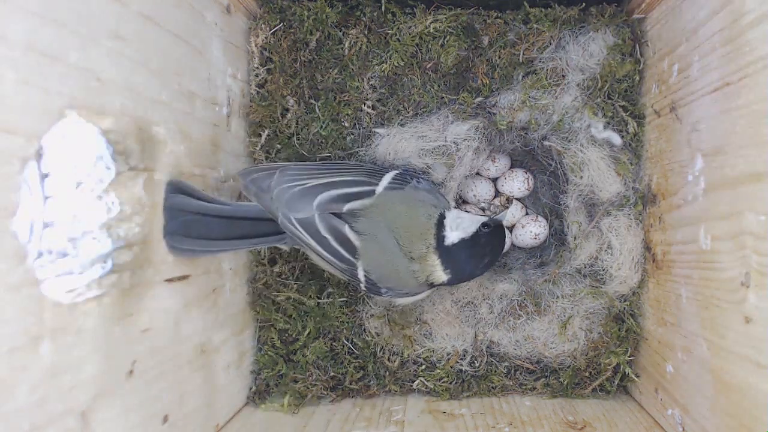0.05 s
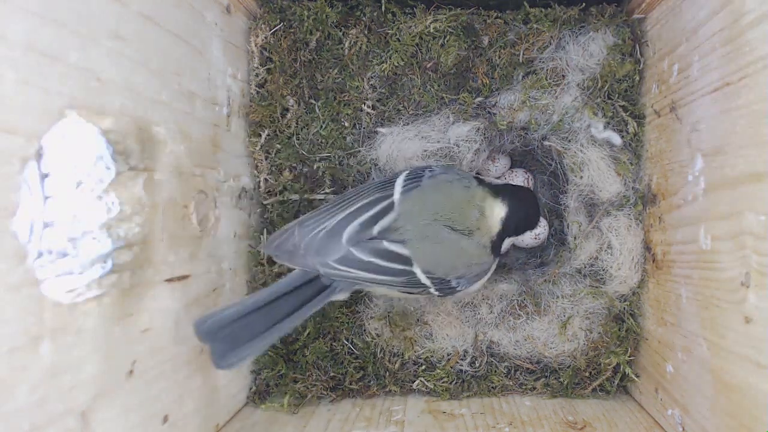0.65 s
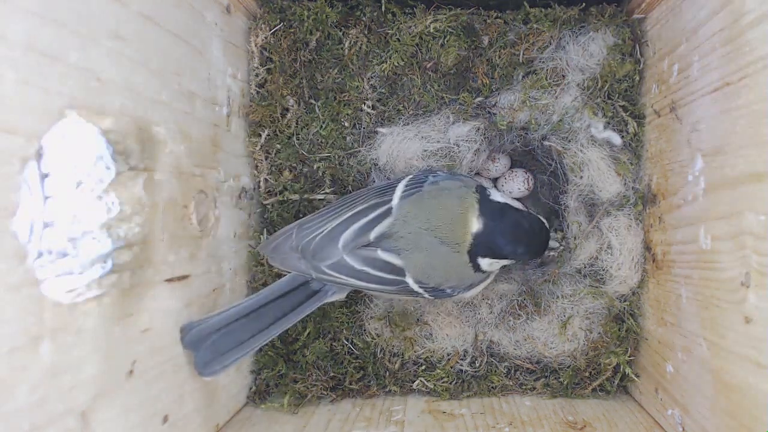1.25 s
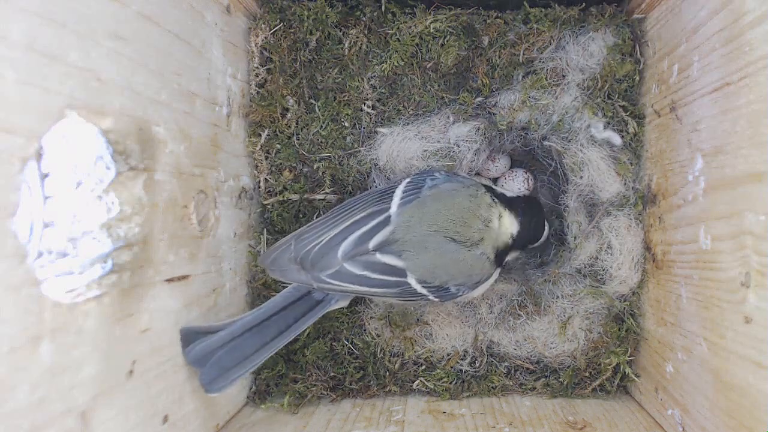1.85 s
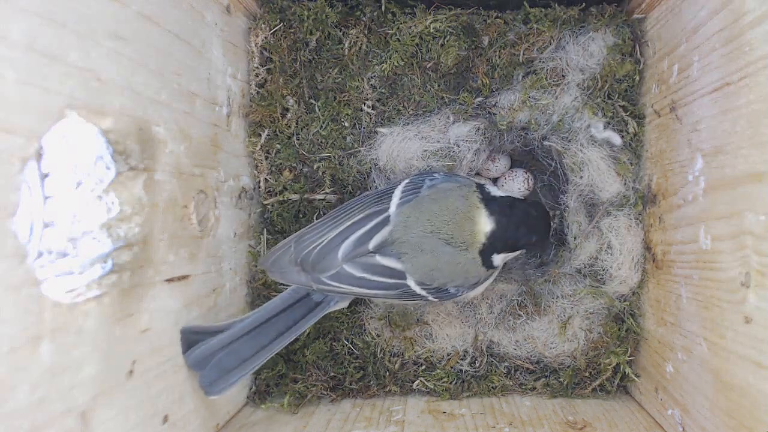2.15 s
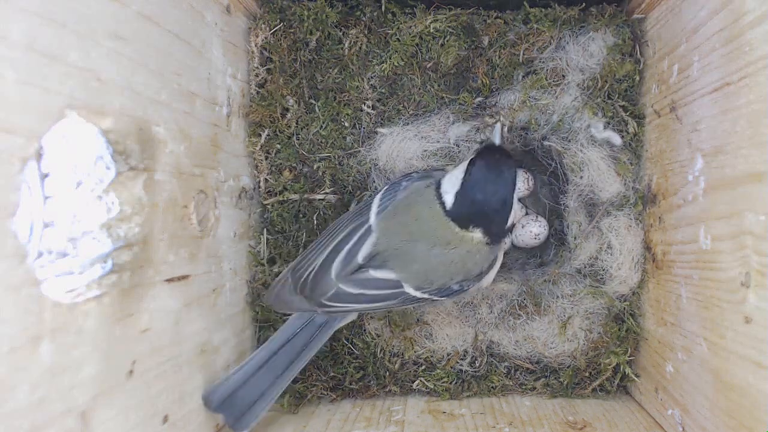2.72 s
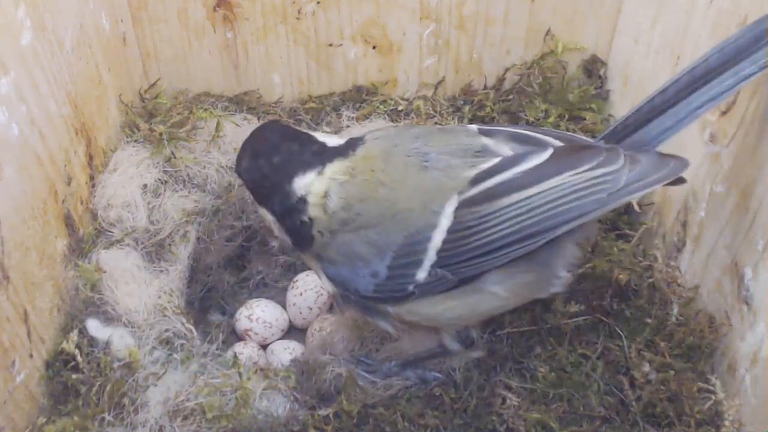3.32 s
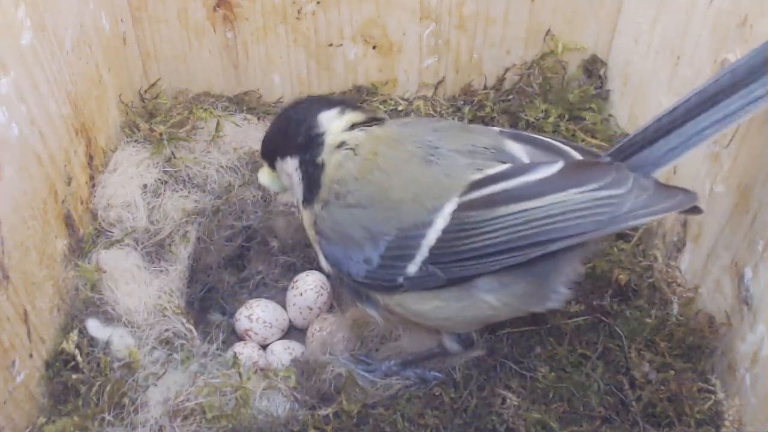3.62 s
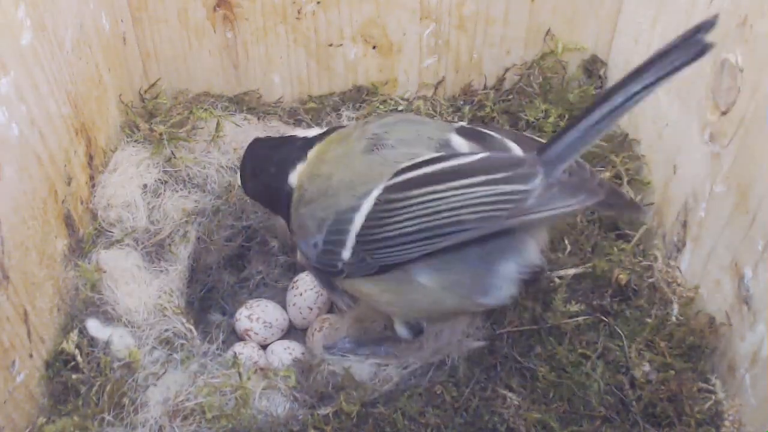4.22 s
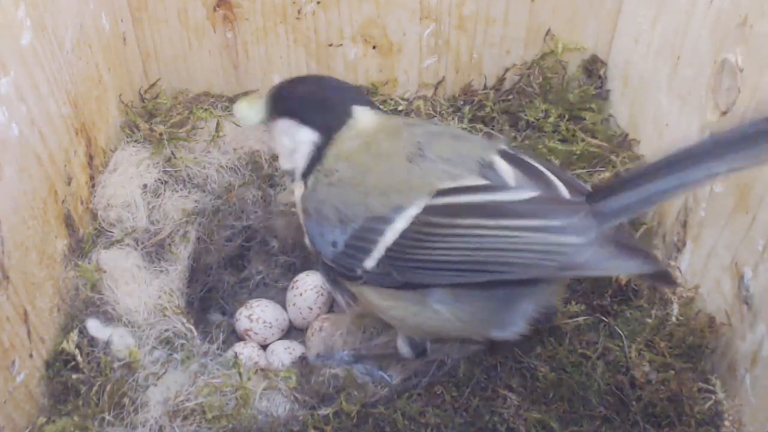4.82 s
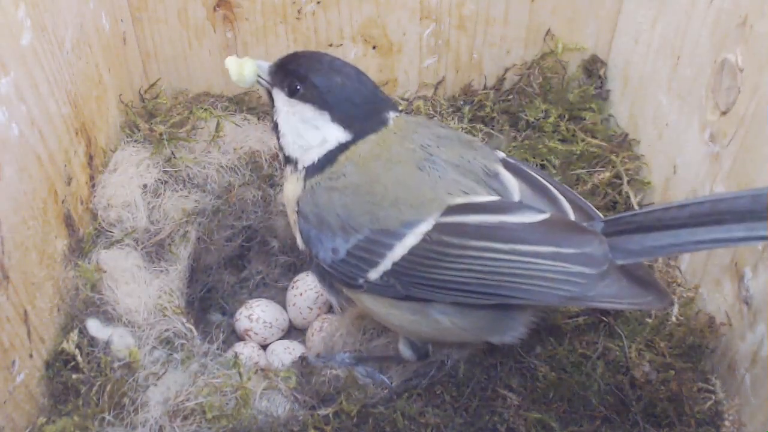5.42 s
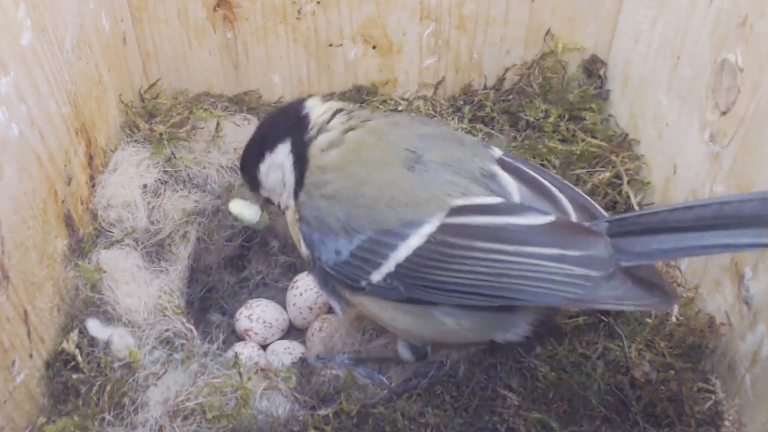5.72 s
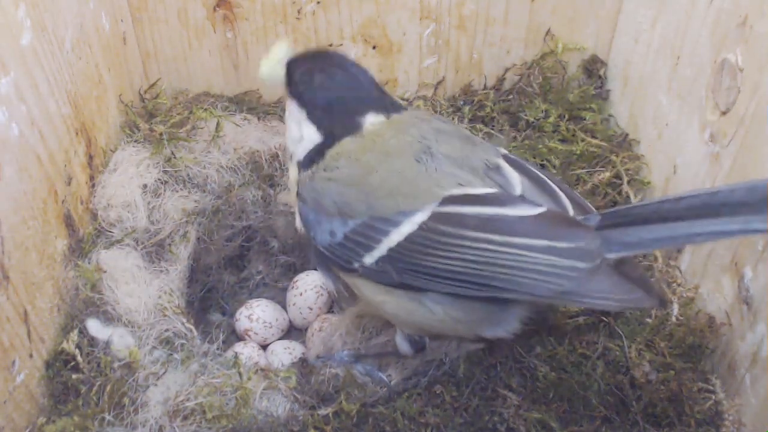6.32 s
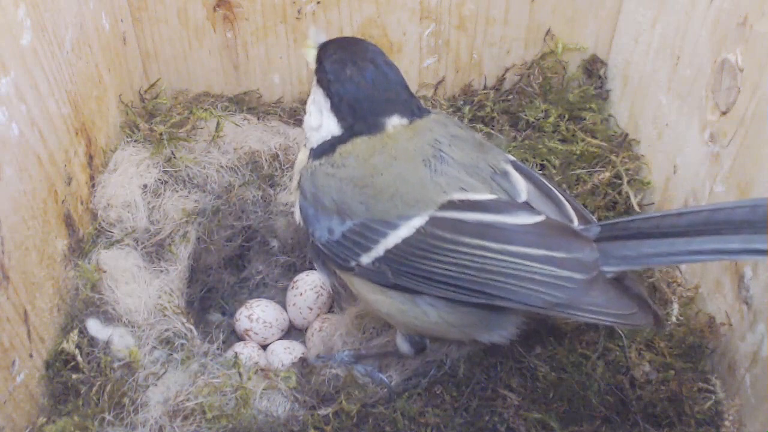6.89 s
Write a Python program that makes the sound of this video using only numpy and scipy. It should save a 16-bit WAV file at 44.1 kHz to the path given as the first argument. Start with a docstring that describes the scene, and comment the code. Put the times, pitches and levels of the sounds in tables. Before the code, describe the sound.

A small bird in a wooden nest box gives short, scratchy rasps in twos and threes, close to the microphone and slightly hollow. Four of the groups end in a thin, high whistle. About halfway through, the rasps become quieter while the whistles stay clear. Another bird sings faintly outside with some echo, and very soft bumps come from the nest, over a low hum and hiss.

```python
"""Great tit in a nest box

A great tit on her nest rasps in twos and threes as her syrinx flaps chaotically in rushing air; some groups end
in a thin whistle. The rasps excite the air modes of the wooden box, her feet bump it softly, and a thrush sings
outside among echoes. We listen first from the roof; then the scene changes to a listening point on a side wall,
all over hum, hiss and a thin electronic whine."""
import sys
import numpy as np
from scipy import signal
from scipy.fft import rfft, irfft, next_fast_len
from scipy.io import wavfile
from scipy.ndimage import uniform_filter1d

SR = 44100
rng = np.random.default_rng(int(sys.argv[2]) if len(sys.argv) > 2 else 0)


def bounce(signal):
    """Save signal as a 16-bit WAV file at the path given by the first command-line argument."""
    frames = np.transpose(np.atleast_2d(signal))
    limited = np.clip(frames, -1, 1)
    pcm = np.round(limited * 32767).astype(np.int16)
    wavfile.write(sys.argv[1], SR, pcm)


N = 306495
TIME = np.arange(N) / SR
SWITCH_S = 2.93  # the scene changes from the roof to the side wall

# The tit's rasps. Each row: start, nominal length and nominal time to the peak in seconds, level in dB,
# throat resonance in Hz, gain of the low part in dB.
RASP_NOTES = [(0.332, 0.047, 0.03, -19, 3083, -2.5), (0.391, 0.056, 0.036, -20, 3146, 3),
              (0.791, 0.054, 0.02, -22.5, 3550, 1.5), (.854, .053, 0.018, -22, 3450, -2.5),
              (1.778, 0.049, 0.041, -23, 3176, 2.5), (1.844, 0.054, .037, -22, 3120, 6),
              (1.91, 0.039, 0.016, -28.5, 3550, 4.5), (3.098, 0.059, 0.031, -30, 3500, 1.5),
              (3.159, 0.059, 0.038, -30.5, 3330, 3.5), (3.909, .045, 0.027, -31, 3470, -3.5),
              (3.964, 0.064, 0.041, -33, 3390, 5.5), (4.03, 0.061, 0.029, -39, 3170, 3.5),
              (4.71, 0.052, 0.032, -34.5, 3140, 5), (4.771, 0.06, 0.024, -34.5, 3110, 5),
              (5.664, 0.056, 0.038, -32, 2809, 1), (5.729, 0.083, 0.027, -34.5, 2669, 5.5)]
# Her whistles. Each row: start, length and attack in seconds, first and top pitch in Hz, glide time in
# seconds, final sag in Hz, time to the surge and its width in seconds, level in dB, tremor from 0 to 1.
WHISTLE_NOTES = [(1.943, 0.13, .011, 4400, 5016, .019, 20, 0.027, 0.014, -21, 0.48),
                 (2.201, 0.081, .004, 4270, 4420, 0.013, 217, 0.06, 0.033, -18, 0.06),
                 (4.07, 0.076, 0.015, 3400, 4964, 0.013, 19.2, 0.044, 0.013, -19.5, 0.4),
                 (5.801, .105, 0.028, 4060, 5010, 0.029, 40, 0.067, 0.01, -25.5, 0.5)]


def great_tit():
    """Two regimes of the syrinx: chaotic oscillation gives rasps, periodic oscillation whistles."""
    out = np.zeros(N)
    for start, *shape in RASP_NOTES:
        add(out, start, rasp(start, *shape))
    for start, *shape in WHISTLE_NOTES:
        add(out, start, whistle(*shape))
    return out


# Her poses, each colouring the rasps until she shifts. Each row: start in seconds, low edge in Hz,
# treble gain in dB.
NEST_POSES = [(0, 1255, 3), (.6, 1277, 2.1), (2.9, 786, 3.5), (3.6, 760, 1), (4.5, 1086, 4), (5.3, 670, 2)]


def rasp(start, length, loudest_s, db, throat_hz, low_db, flap_hz=420, lead_s=0.0027):
    """Source and filter: chaotic flaps and turbulent air are shaped by the throat and the box."""
    size = int(SR / 5)
    progress = np.interp(np.arange(size) / SR, [0, loudest_s - lead_s, length - lead_s], [0, .5, 1])
    pressure = np.abs(np.sin(np.pi * progress)) ** .99 * undb(wander(size, 300))
    cycles = np.cumsum(flap_hz * np.exp(.5 * wander(size, 900))) / SR
    flaps = np.diff(np.floor(cycles), prepend=0) * undb(2 * rng.standard_normal(size))
    catch = np.maximum(wander(size, 260), 0)  # the syrinx catches briefly on the throat resonance
    squeal = catch * sine(throat_hz * (1 + .05 * wander(size, 500)))
    source = pressure * (level(flaps, -3) + level(squeal, -12) + rng.standard_normal(size))
    _, low_hz, treble_db = [pose for pose in NEST_POSES if pose[0] <= start][-1]
    tilt = lambda f: undb(np.interp(f, [2000, 2900, 3970, 5400], [low_db, 0, 0, treble_db]))
    throat = lambda f: 1 + undb(3) * resonance(f, throat_hz, width=350) / 2
    note = colour(source, lambda f: nest_box(f, start, low_hz) * tilt(f) * throat(f))
    note = echoes(note, t60=.075, wet_db=-8, count=200)
    return level(note, db) * np.sqrt(length * SR / size)


def whistle(length, attack_s, first_hz, top_hz, glide_s, sag_hz, loudest_s, surge_s, db, tremor,
            hold_db=-9.5, tremor_hz=125.4, sag_s=.009):
    """Self-sustained oscillation: a tone glides up, surges once and beats against its echoes in the box."""
    t = np.arange(int(SR / 4)) / SR
    surge = np.exp(-((t - loudest_s) / surge_s) ** 2)
    shaky = tremor * (1 - surge)  # steadiest where it is blown hardest
    jitter = .0025 + .004 * shaky + .012 * np.exp(-t / .015)  # rough until the syrinx locks in
    glide = top_hz + (first_hz - top_hz) * np.exp(-t / glide_s)
    sag = sag_hz * np.exp(np.minimum(t - length, 0) / sag_s)  # the breath runs out
    pitch = (glide - sag) * (1 + jitter * wander(len(t), 450))
    swell = envelope(t, length, attack_s, release=.0043) * undb(hold_db * (1 - surge))
    tremble = sine(tremor_hz * np.exp(.35 * wander(len(t), 100)))
    flutter = (1 + shaky * tremble) * undb(4 * shaky * wander(len(t), 120))
    tone = echoes(flutter * swell * sine(pitch), t60=.08, wet_db=-13, count=120)
    return level(tone, db) * np.sqrt(np.mean(swell ** 2))


# Air modes of the box at the roof and at the side wall. Each row: frequency in Hz, nominal width in Hz,
# relative gain in dB.
BOX_MODES_ROOF = [(1163, 120, -15.5), (1470, 13, -11), (1735, 32, -2), (2044, 18, -1.5), (2200, 100, -6),
                  (2520, 85, -6), (2780, 17, -4.5), (3000, 43, -2), (3210, 24, -6.5), (3600, 30, -3),
                  (4036, 35, -10), (4350, 110, -8), (4860, 64, -23), (4745, 70, -13.5), (5240, 47, -16),
                  (5830, 200, -20.5), (6560, 81, -21.5), (6620, 120, -19.5), (7000, 150, -24.5)]
BOX_MODES_WALL = [(647, 82, -10), (801.5, 15, -6), (1056, 51, -1), (1142, 19, -13.5), (1371, 11, -4.5),
                  (1670, 20, -0.5), (1806, 75, -4.5), (2103, 35, -3.5), (2530, 17, -4.5), (2780, 23, -1),
                  (3110, 87, -2), (3476, 150, -1.5), (3810, 15, -5), (4070, 78, -4.5), (4900, 67, -6),
                  (5500, 97, -15), (6060, 77, -16), (6660, 68, -19), (7160, 76, -15)]


def nest_box(f, start, low_hz, top_hz=7300, width_scale=0.46, moss=.018):
    """Cavity resonance: the modes add in power, shifted and reweighted by her posture at every note."""
    modes = BOX_MODES_ROOF if start < SWITCH_S else BOX_MODES_WALL
    posture = rng.standard_normal((len(modes), 2)) * [.007, 1.5]
    power = 0
    for (hz, width, db), (shift, lift_db) in zip(modes, posture):
        damped_width = np.hypot(width_scale * width, moss * hz)  # moss and feathers widen every mode
        power += (undb(db + lift_db) * resonance(f, hz * (1 + shift), damped_width)) ** 2
    high_pass = low_pass(low_hz, f, order=6)
    return np.sqrt(power) * high_pass * low_pass(f, top_hz, order=22)


# The thrush's slurred, buzzing and held notes. Each row: start and length in seconds, first and last
# pitch in Hz, level in dB before the song gain; held notes add a vibrato depth in Hz.
SLUR_NOTES = [(0.111, .11, 1720, 1815, -60), (.2, 0.081, 1790, 2060, -53), (.25, 0.025, 1535, 1480, -50.5),
              (.312, 0.039, 1480, 1502, -48), (1.351, 0.15, 1843, 2093, -55),
              (1.45, 0.099, 2060, 1950, -62), (2.08, 0.1, 1937, 1915, -67.5),
              (5.884, 0.059, 2400, 1880, -54), (5.955, 0.04, 2380, 2270, -54),
              (6.059, 0.11, 1850, 1990, -64), (6.43, .14, 2100, 1773, -59), (6.597, .14, 1620, 1540, -67)]
BUZZ_NOTES = [(2.596, 0.072, 2230, 3477, -49.5), (2.665, 0.09, 2514, 3440, -49.5),
              (2.74, .12, 3355, 2540, -49), (2.768, .18, 3420, 2723, -55.5), (3.045, 0.16, 2460, 2270, -54),
              (6.15, .14, 2302, 2900, -53), (6.248, 0.096, 2705, 2296, -49),
              (6.318, 0.1, 2617, 2370, -52.5)]
HELD_NOTES = [(2.235, 0.18, 2378, 2347, -47.5, 28), (2.34, 0.2, 2349, 2387, -44.5, 36),
              (3.255, 0.15, 2205, 2386, -57.5, 16), (3.355, .185, 2300, 2228, -54, 14),
              (6.753, 0.22, 2670, 2700, -46.5, 8.5)]
# Its short rising chips. Each row: start in seconds, level in dB before the song gain.
CHIP_NOTES = [(1.145, -61.5), (1.22, -67), (1.376, -66.5), (1.439, -63), (1.52, -69.5)]


def thrush(song_gain_db=2.53):
    """Frequency modulation: the depth and rate of a trill set slurs, buzzes and held notes apart."""
    slur = dict(trill_depth_hz=40, trill_hz=89, bow=.52, throb=.63, overtone_db=-30)
    buzz = dict(trill_depth_hz=153, trill_hz=140, bow=.11, throb=.83, overtone_db=-35.5)
    held = dict(trill_hz=39, bow=0, throb=.28, overtone_db=-50)
    twitter = dict(trill_depth_hz=208, trill_hz=682, bow=0, throb=1.5, overtone_db=-24.5)
    out = np.zeros(N)
    for notes, style in (SLUR_NOTES, slur), (BUZZ_NOTES, buzz), (HELD_NOTES, held):
        for start, *shape in notes:
            add(out, start, thrush_note(*shape, **style))
    for start, db in CHIP_NOTES:
        add(out, start, thrush_note(length=.065, first_hz=3730, last_hz=4190, db=db, **slur))
    for k in range(4):  # an even twitter, each note lower and softer than the one before
        start, hz, db = 3.514 + .067 * k, 3520 - 73 * k, -57.5 - 1.5 * k
        add(out, start, thrush_note(length=.051, first_hz=hz, last_hz=hz, db=db, **twitter))
    return undb(song_gain_db) * out


def thrush_note(length, first_hz, last_hz, db, trill_depth_hz, trill_hz, bow, throb, overtone_db):
    """Multipath propagation: echoes from trees and walls smear one arched, trilled glide."""
    progress = np.linspace(0, 1, int(length * SR))
    arch = bow * abs(last_hz - first_hz) * (1 - (2 * progress - 1) ** 2)
    glide = first_hz + (last_hz - first_hz) * progress + arch
    trill = np.sin(2 * np.pi * trill_hz * length * progress) + .45 * wander(len(progress), 600)
    pitch = glide + trill_depth_hz * trill
    swell = signal.windows.tukey(len(progress), .4) * (1 + throb * trill)  # loudness follows the trill
    tone = sine(pitch) + undb(overtone_db) * sine(2 * pitch)
    note = np.pad(swell * tone, (0, SR // 2))
    note = echoes(note, t60=.08, wet_db=-6, count=60)
    note = echoes(note, t60=.5, wet_db=-6, count=300)
    return level(note, db) * np.sqrt(len(progress) / len(note))


# The firmest bumps of feet and body on the nest. Each row: time in seconds, level in dB.
FIRM_BUMPS = [(.41, -64.5), (.68, -65.5), (1.16, -65), (2.21, -66), (2.669, -64), (3.87, -65.5),
              (5.42, -70)]


def bumps(push_s=.008, fidgets_per_s=4, fidget_db=-73.5):
    """Impact excitation: firm bumps and random fidgets ring a low wood resonance through the moss."""
    out = np.zeros(N)
    t = np.arange(int(SR / 8)) / SR
    chance = rng.random((int(fidgets_per_s * N / SR), 2))
    fidgets = [(when * N / SR, fidget_db + 2 * force - 1) for when, force in chance]
    for start, db in FIRM_BUMPS + fidgets:
        hz, width = (550, 13) if start < SWITCH_S else (801, 12)
        push = rng.standard_normal(len(t)) * t * np.exp(-t / push_s)
        ring = colour(push, lambda f: resonance(f, hz, width) * low_pass(f, 1.2 * hz, order=5))
        add(out, start - push_s, level(ring, db))
    return out


# Noise spectra at the roof and at the side wall. Each row: frequency in Hz, relative density in dB.
ROOF_SPECTRUM = [(25, 3), (42, 9.5), (65, 2.5), (110, 10), (200, -7), (330, 7), (440, -3.5), (545, 11.5),
                 (650, -5.5), (800, -3.5), (1100, 3.5), (1800, -7.5), (3000, 0), (5000, -10.5),
                 (9000, -23.5), (15000, -23.5)]
WALL_SPECTRUM = [(25, 0), (45, 12.5), (70, 8.5), (110, -1), (200, -7.5), (450, -9.5), (780, -1.5),
                 (900, -7), (1100, -3.5), (1750, -15.5), (2500, -4), (3200, -2), (5000, -11.5), (9000, -24),
                 (15000, -25.5)]
# Swells of the hum at the side wall. Each row: start and length in seconds, added level in dB.
HUM_SWELLS = [(3.978, .29, -67), (4.824, 0.925, -57)]


def background(crossfade_s=.022, rest_db=-78.5):
    """Noise floor: broadband noise and low hums, crossfaded from the roof to the side wall."""
    roof = air(ROOF_SPECTRUM, -60.5) + hum(141, -60.5) + hum(140, -72.5, waver_db=6)
    roof = roof + hum(70, -69, waver_db=0) + hum(310, -78.5, waver_db=5)
    swells = sum(undb(db) * envelope(TIME - start, length, attack=.1, release=.067)
                 for start, length, db in HUM_SWELLS)
    swell_db = 20 * np.log10(swells + undb(rest_db))
    wall = air(WALL_SPECTRUM, -62.5) + hum(111, swell_db, waver_db=1.5, rate=22)
    wall += hum(134, swell_db - 14, waver_db=3, rate=16)
    moved = np.clip((TIME - SWITCH_S) / crossfade_s, 0, 1)
    return roof * (1 - moved) + wall * moved


def air(spectrum, db, flicker_db=1.5):
    """Spectrally shaped noise: the low part flickers, the hiss is steady."""
    hz, density_db = np.transpose(spectrum)
    noise = colour(rng.standard_normal(N), lambda f: undb(np.interp(np.log(f), np.log(hz), density_db)))
    low = signal.sosfiltfilt(signal.butter(2, 1300, fs=SR, output="sos"), noise)
    return level(noise + low * (undb(flicker_db * wander(N, 21)) - 1), db)


def electronics(hum_hz=50, whine_hz=15625):
    """Electrical interference: a steady low hum and a thin whine."""
    return hum(hum_hz, -66.5, waver_db=0, rate=26) + hum(whine_hz, -68.5, rate=90)


def hum(hz, db, waver_db=1, rate=6):
    """Amplitude modulation: a tone of constant pitch wavers in level."""
    tone = np.sqrt(2) * np.sin(2 * np.pi * (hz * TIME + rng.random()))
    return tone * undb(db + waver_db * wander(N, rate))


def echoes(x, t60, wet_db, count):
    """Convolution: the direct sound plus scattered delayed copies that fall 60 dB in t60 seconds."""
    delay, polarity = rng.random((count, 2)).T
    taps = np.sign(polarity - .5) * np.exp(-np.log(1000) * delay)
    response = np.zeros(int(t60 * SR) + 2)
    np.add.at(response, (delay * t60 * SR).astype(int) + 1, taps)
    response *= undb(wet_db) / np.sqrt(np.sum(response ** 2))
    response[0] = 1
    return signal.fftconvolve(x, response)[:len(x)]


def colour(x, gain):
    """Minimum-phase filter with a gain given as a function of frequency; narrow peaks ring on."""
    size = next_fast_len(len(x) + 8192, True) // 2 * 2
    f = np.arange(size // 2 + 1) * SR / size + 1
    cepstrum = irfft(np.log(gain(f) + 1e-9))
    cepstrum[1:size // 2] *= 2  # folding the cepstrum makes the filter causal
    cepstrum[size // 2 + 1:] = 0
    return irfft(rfft(x, size) * np.exp(rfft(cepstrum)))[:len(x)]


def resonance(f, hz, width):
    """Gain of a damped oscillator with a half-power width in Hz."""
    return 1 / np.sqrt(1 + ((f * f - hz * hz) / (f * width)) ** 2)


def low_pass(f, hz, order):
    """Gain of a maximally flat low-pass."""
    return 1 / np.sqrt(1 + (f / hz) ** (2 * order))


def sine(hz):
    """Oscillator whose phase is the integral of its frequency."""
    return np.sin(2 * np.pi * np.cumsum(hz) / SR)


def envelope(t, length, attack, release):
    """Linear attack, hold and release within a length in seconds."""
    return np.clip(np.minimum(t / attack, (length - t) / release), 0, 1)


def wander(size, rate):
    """Smooth random motion with a spread near 1 and rate steps a second."""
    step = max(int(SR / rate), 1)
    stairs = np.repeat(rng.standard_normal(size // step + 1), step)
    return 1.2 * uniform_filter1d(stairs, step)[:size]


def undb(db):
    """Decibels to amplitude gain."""
    return 10 ** (np.asarray(db) / 20)


def level(x, db):
    """Scale to an rms level."""
    return x * undb(db) / np.sqrt(np.mean(x ** 2) + 1e-18)


def add(out, start, x):
    """Mix x into out from a time in seconds."""
    i = max(int(start * SR), 0)
    out[i:i + len(x)] += x[:max(N - i, 0)]


def scene():
    """Superposition of all sources: nearly mono, with a faint stereo width."""
    mid = great_tit() + thrush() + bumps() + background() + electronics()
    width = echoes(mid, t60=.01, wet_db=-12, count=30) - mid
    side = undb(-24) * colour(width, lambda f: low_pass(f, 7500, order=8))
    return np.array([mid + side, mid - side])


def record(dry):
    """Band limiting: the recorder cuts the treble above 16 kHz."""
    return signal.sosfilt(signal.ellip(10, .1, 80, 16000, fs=SR, output="sos"), dry)


dry = scene()
out = record(dry)
bounce(out)
```